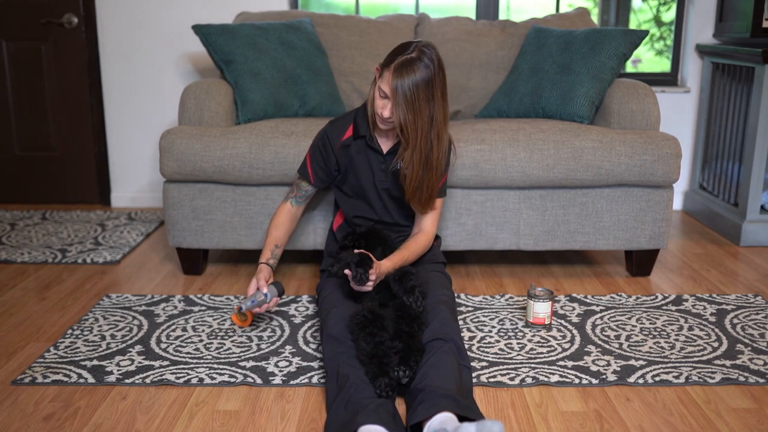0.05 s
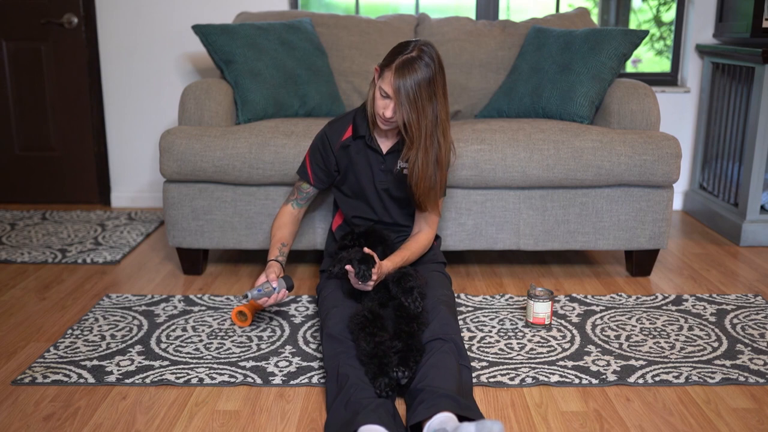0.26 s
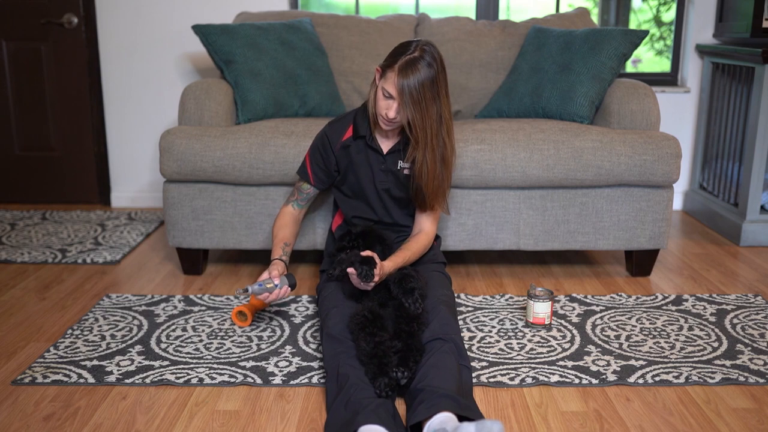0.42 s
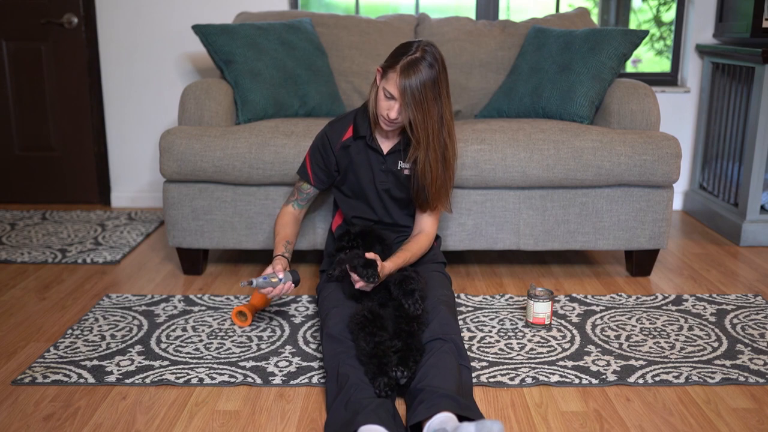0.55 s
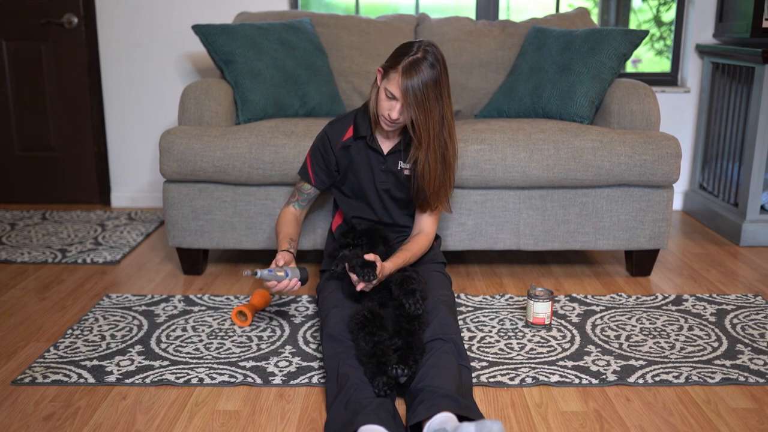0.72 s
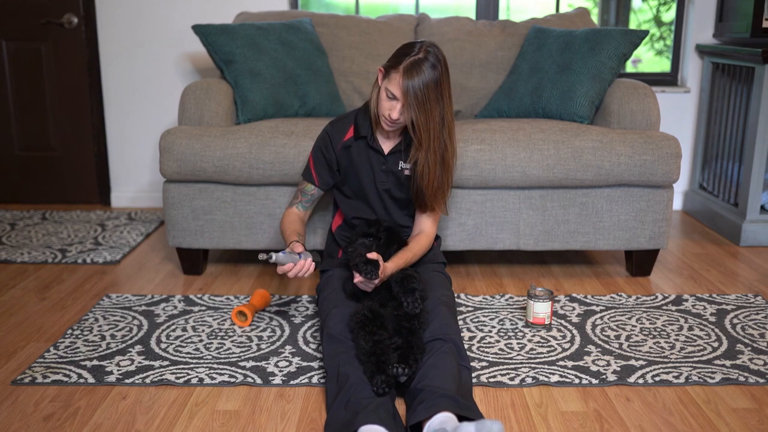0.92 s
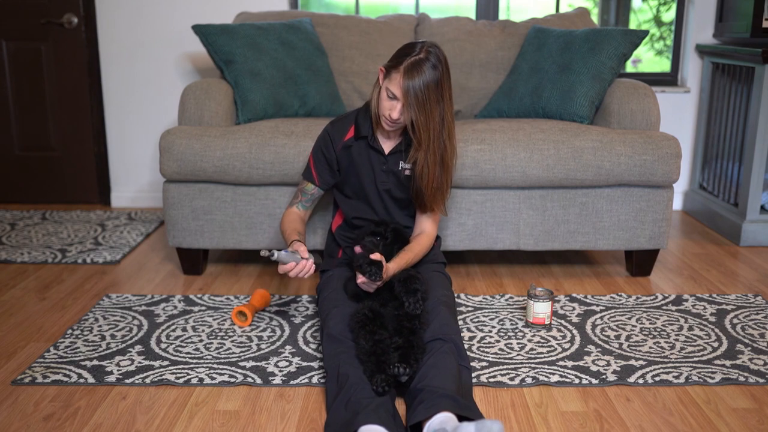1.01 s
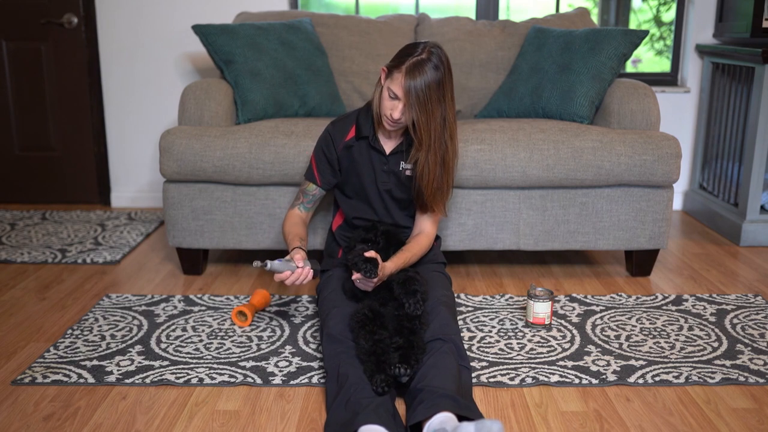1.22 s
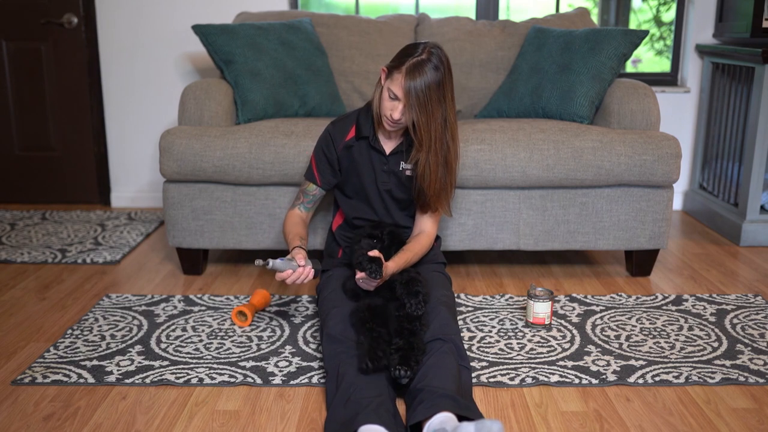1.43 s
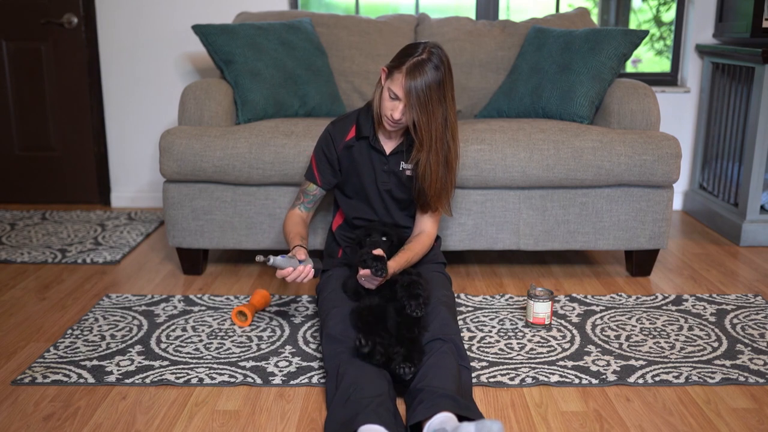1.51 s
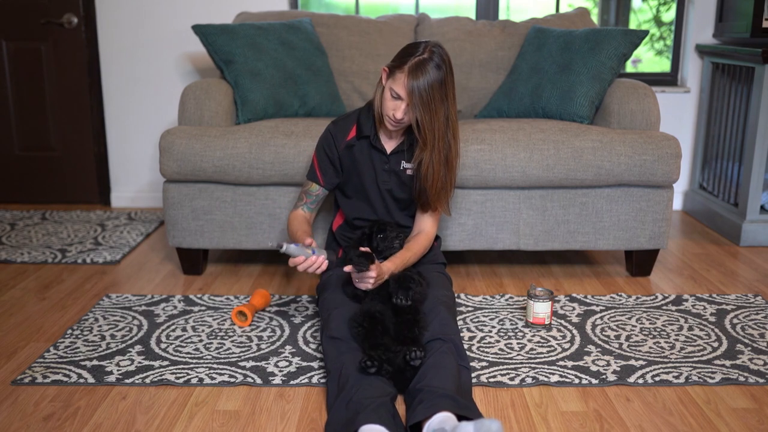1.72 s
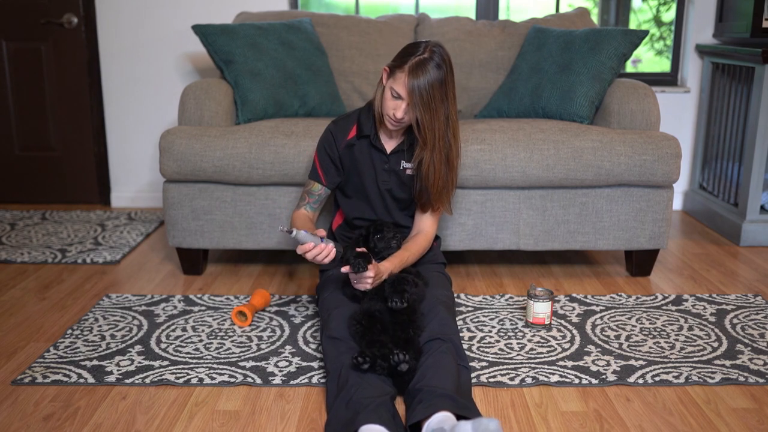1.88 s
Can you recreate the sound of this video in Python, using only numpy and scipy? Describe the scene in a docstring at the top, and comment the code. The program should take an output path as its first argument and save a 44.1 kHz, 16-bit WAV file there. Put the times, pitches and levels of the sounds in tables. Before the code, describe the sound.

A small battery rotary tool is handled indoors, a few metres away and slightly left. Light plastic ticks and rustle run from 0.1 s, with the sharpest switch snap near 0.43 s. The motor whines and hisses up at once, peaks by 0.6 s and coasts down until 0.95 s. After a faint rustle, a higher, more rattling burst starts at 1.2 s, peaks near 1.45 s and fades by 1.9 s over quiet room tone.

```python
"""A quiet living room: a small battery rotary tool is picked up a few metres from the microphone, slightly left.
Its plastic shell ticks and the switch snaps, as cracks of noise ringing the shell; the hand rustles in grainy noise.
The motor spins up and coasts down twice: tones for the commutator whine, pulsing noise for the brush hiss and
once-a-turn knocks for the shaft rattle. A hard surface returns a strong early echo, over a quiet room tone."""
import sys
import numpy as np
from scipy import signal
from scipy.fft import rfft, irfft
from scipy.io import wavfile
from scipy.ndimage import uniform_filter1d

SR = 44100
rng = np.random.default_rng(int(sys.argv[2]) if len(sys.argv) > 2 else 0)


def gain_from_decibels(decibels):
    """Convert decibel values to linear amplitude factors."""
    exponent = np.asarray(decibels, float) / 20
    return 10 ** exponent


def transcribe(u):
    """Save the signal u as a 16-bit wav file named by the first command-line argument.

    u: samples, shape (n,) or (channels, n), limited to [-1, 1]; the rate is SR.
    q: integer samples, one column per channel.
    """
    v = np.clip(np.atleast_2d(u).T, -1, 1)
    q = np.round(v * 32767).astype(np.int16)
    wavfile.write(sys.argv[1], SR, q)


N = 85995  # length in samples


def unit(x):
    """Scale to rms 1."""
    return x / np.sqrt(np.mean(x ** 2))


def shaped(x, points):
    """Filter by (Hz, dB) points joined on a log frequency axis."""
    hz, db = np.array(points, float).T
    f = np.arange(len(x) // 2 + 1) * SR / len(x) + 1
    gain = gain_from_decibels(np.interp(np.log(f), np.log(hz), db))
    return irfft(rfft(x) * gain, len(x))


def resonate(x, peaks):
    """Parallel band-pass resonances (Hz, width Hz, dB) of alternating sign."""
    out = 0
    for k, (hz, width, db) in enumerate(peaks):
        ring = signal.lfilter(*signal.iirpeak(hz, hz / width, SR), x)
        out = out + (-1) ** k * gain_from_decibels(db) * ring
    return out


def walk(rate):
    """Smooth random wander of rms 1, averaged twice over 1 / rate seconds."""
    k = int(SR / rate)
    once = uniform_filter1d(rng.standard_normal(N), k)
    return unit(uniform_filter1d(once, k))


# The two motor runs, as heard at the tool before the room. Each row: time in seconds, whine pitch in Hz,
# whine level in dB, brush hiss level in dB, shaft rattle level in dB.
MOTOR_RUNS = [
    [(.43, 853.5, -53, -41, -66), (.468, 1060, -56, -51, -64), (.5, 1209, -52, -49.5, -57),
     (.53, 1270, -40, -49.5, -73), (.562, 1285, -62, -53, -62), (.58, 1303, -46, -50.5, -74),
     (.615, 1275, -45, -54, -68), (.635, 1130, -68, -55, -59), (.655, 1000, -53.5, -52, -51),
     (.69, 940, -68, -55.5, -50), (.776, 873, -80, -58.5, -64), (.85, 798.3, -84, -67, -74.5),
     (.95, 701, -97, -90, -81)],
    [(1.21, 802.4, -82, -90, -64), (1.24, 928.4, -73, -55.5, -72), (1.262, 1030, -52, -54.5, -65),
     (1.31, 1262, -49.5, -48, -51.5), (1.35, 1350, -46.5, -50, -55.5), (1.385, 1427, -42.5, -51, -46.5),
     (1.43, 1462, -45, -49, -59), (1.458, 1460, -70, -50, -55), (1.486, 1443, -37, -49, -42),
     (1.525, 1295, -47, -47, -49), (1.555, 1130, -50, -49, -47), (1.585, 1011, -59, -50.5, -49.5),
     (1.65, 900, -66, -54, -56.5), (1.74, 745.4, -89, -60.5, -64), (1.81, 648.4, -83, -69, -67),
     (1.9, 552.3, -84, -79, -71)],
]
# Broad colour of the brush hiss. Each row: frequency in Hz, relative level in dB per Hz.
BRUSH_HISS_COLOUR = [(300, -43.5), (600, -35.5), (1200, -12.5), (1800, -16.5), (3900, -19.5), (7000, -17),
                     (11000, -18.5), (13000, -25), (15700, -29.5)]
# Resonances on top of the hiss. Each row: centre in Hz, width in Hz, relative level in dB.
BRUSH_HISS_PEAKS = [(4160, 190, -11), (5830, 670, 4), (8680, 400, -19), (11330, 300, 1.5)]
# Housing resonances that the knocks ring. Each row: centre in Hz, width in Hz, relative level in dB.
HOUSING_RESONANCES = [(1166, 340, -11.5), (1426, 74, 5.5), (1617, 98, 2.5), (1960, 560, -2),
                      (2435, 340, 1.5), (2940, 480, -4), (4580, 1150, -8), (9000, 8000, -22.5)]
# Weaker tones on the shaft. Each entry: multiple of the shaft rate.
SHAFT_MULTIPLES = (6, 8, 10, 12, 15, 18)
# Their strengths in the same order. Each entry: mean level against the whine in dB.
SHAFT_MULTIPLES_DB = [-31, -32, -11, -23.5, -11, -27.5]


def motor(t):
    """Whine on the commutator rate, hiss pulsing each turn, and a knock per turn that rings the housing."""
    rows = np.concatenate([np.array(run, float) for run in MOTOR_RUNS])
    running = sum((t >= run[0][0]) & (t <= run[-1][0]) for run in MOTOR_RUNS)
    hz, whine_db, hiss_db, rattle_db = (np.interp(t, rows[:, 0], rows[:, k]) for k in range(1, 5))
    cycles = np.cumsum(hz) / SR
    turn = cycles / 9  # nine whine cycles per shaft turn

    flutter_db, blur_hz, blur_db = 1.5, 60, -10
    blur = walk(blur_hz) + 1j * walk(blur_hz)
    wavering = gain_from_decibels(flutter_db * walk(25)) + gain_from_decibels(blur_db) * blur
    whine = np.real(np.exp(2j * np.pi * cycles) * wavering)
    shaft_tones = 0
    for k, db in zip(SHAFT_MULTIPLES, SHAFT_MULTIPLES_DB):
        shaft_tones = shaft_tones + gain_from_decibels(db + 2.9 * walk(19)) * np.sin(2 * np.pi * k * turn)

    noise = rng.standard_normal(N)
    hiss = unit(shaped(noise, BRUSH_HISS_COLOUR)) + 2 * resonate(noise, BRUSH_HISS_PEAKS)
    hiss = hiss * (1 + 0.16 * np.cos(2 * np.pi * turn))

    knock_scatter_db, grit_db = 2.5, -4
    new_turn = np.diff(np.floor(turn), prepend=0) > 0
    knocks = new_turn * gain_from_decibels(knock_scatter_db * rng.standard_normal(N))
    gritty_knocks = unit(knocks) + gain_from_decibels(grit_db) * rng.standard_normal(N)
    rattle = unit(resonate(gritty_knocks, HOUSING_RESONANCES))

    mix = gain_from_decibels(whine_db) * (whine + shaft_tones) + gain_from_decibels(hiss_db) * hiss + gain_from_decibels(rattle_db) * rattle
    return mix * uniform_filter1d(running * 1., size=400)  # soft edges


# Ticks of shell and switch at the tool. Each row: start in seconds, relative level in dB,
# favoured region in Hz, crack time scale in ms.
SHELL_TICKS = [(0.136, -36, 3080, 0.71), (0.1724, -35.5, 2400, 0.52), (0.2272, -45, 8000, 1.5),
               (.242, -29, 5200, 1.84), (0.289, -43, 9000, 1.9), (0.3387, -40, 1960, 1),
               (.381, -39, 2900, 1), (0.4054, -36, 1390, 0.61), (0.4252, -19.5, 3940, 0.95),
               (0.47, -34.5, 7000, 1.46)]
# Broad resonances of the plastic shell. Each row: centre in Hz, width in Hz, relative level in dB.
SHELL_RESONANCES = [(900, 580, -5.5), (1202, 160, 1), (1730, 170, -0.5), (2253, 610, -1.5),
                    (2675, 720, 1.5), (3587, 440, 0.5), (4370, 520, 1.5), (5560, 1200, 0.5),
                    (7090, 2200, 6.5), (8300, 2100, 6), (10460, 5400, 4.5), (14500, 8400, -18)]


def ticks():
    """Each tick is a short crack of noise shared out over the broad resonances of the shell."""
    size = 2000  # samples per tick
    all_ticks_db, scatter_db, favour_db_per_oct2 = -11, 1, 2.5
    out, tau = np.zeros(N + size), np.arange(size) / SR
    draws = rng.standard_normal((len(SHELL_TICKS), size + len(SHELL_RESONANCES)))
    for (start, tick_db, favoured_hz, ms), chance in zip(SHELL_TICKS, draws):
        x = tau * 1000 / ms
        crack = chance[:size] * x * np.exp(-2 * x)
        first = int(start * SR)
        for (hz, width, db), scatter in zip(SHELL_RESONANCES, chance[size:]):
            octaves = np.log2(hz / favoured_hz)
            ring_db = db + scatter_db * scatter - favour_db_per_oct2 * octaves ** 2
            ring = resonate(resonate(crack, [(hz, width, 0)]), [(hz, 2 * width, 0)])
            ring = unit(ring) * np.sqrt(ms * SR / 1000 / size)  # longer cracks carry more energy
            out[first:first + size] += gain_from_decibels(tick_db + all_ticks_db + ring_db) * ring
    return out[:N]


# Fingers and cloth rustling on the shell, before the room. Each row: time in seconds, level in dB.
HAND_RUSTLE = [(.12, -103), (.145, -59), (.23, -60.5), (.27, -63), (.36, -62.5), (.42, -59), (.45, -76),
               (.98, -83), (1.05, -63.5), (1.13, -91)]


def rustle(t):
    """Grainy friction noise in one broad band while the hand shifts."""
    grains = rng.standard_normal(N) * gain_from_decibels(2.5 * walk(300))
    friction = unit(resonate(grains, [(2380, 2200, 0)]))
    seconds, db = np.array(HAND_RUSTLE).T
    return gain_from_decibels(np.interp(t, seconds, db)) * friction


# Hard echoes after the first. Each row: delay in seconds, level against the direct sound in dB,
# lean to the right (1 is 2 dB up and 10 samples later on the right, the reverse on the left).
LATER_ECHOES = [(.0131, -10, -.5), (.0203, -6, .6), (.034, -10, -.4)]


def room(x):
    """Direct sound, a few hard echoes and a diffuse tail that differs left and right."""
    tail_db, t60_low_s, t60_high_s = 1.5, .36, .5
    bass_shared = .75  # share of the low tail's power common to both sides
    left_over_right_db = 1.5
    echoes = [(.0065, 1.5, 0)] + LATER_ECHOES  # the first is stronger than the direct sound
    tau, out = np.arange(SR // 2) / SR, []
    common = rng.standard_normal(len(tau))
    for side in (-1, 1):  # left, right
        own = rng.standard_normal(len(tau))
        low = uniform_filter1d(np.sqrt(bass_shared) * common + np.sqrt(1 - bass_shared) * own, size=9)
        high = np.diff(rng.standard_normal(len(tau)), prepend=0)
        tail = low * gain_from_decibels(-60 * tau / t60_low_s) + 0.37 * high * gain_from_decibels(-60 * tau / t60_high_s)
        tail *= np.clip((tau - .008) / 0.0052, 0, 1)  # sets in after 8 ms
        response = gain_from_decibels(tail_db) * tail / np.sqrt(np.sum(tail ** 2))
        response[0] += 1
        for delay, db, lean in echoes:
            response[int(delay * SR + side * lean * 10)] += gain_from_decibels(db + side * lean * 2)
        heard = signal.fftconvolve(x, response)[:N]
        out.append(gain_from_decibels(-side * left_over_right_db / 2) * heard)
    return .6 * np.array(out)


# Colour of the room tone at the microphone. Each row: frequency in Hz, relative level in dB per Hz.
AIR_COLOUR = [(20, -32), (40, -40), (60, -20), (110, -22), (150, -13.5), (210, -14), (400, -2.5),
              (650, -4.5), (1200, -3), (2240, -8), (4520, -10.5), (15600, -16.5)]
# Stereo spread of the room tone. Each row: frequency in Hz, side minus mid in dB.
AIR_SPREAD = [(30, -19), (60, -23), (125, -14), (250, -10), (500, -5), (1000, -0.5), (2400, 2), (8000, 1.5),
              (15000, -1)]
# Faint wavering tones. Each row: frequency in Hz, mean level in dB.
HUM_TONES = [(165, -92), (150, -98)]


def air(t):
    """Quiet room tone and microphone hiss as shaped stereo noise, with a faint wavering hum."""
    mid, other = (gain_from_decibels(-64) * unit(shaped(rng.standard_normal(N), AIR_COLOUR)) for _ in range(2))
    hum = sum(gain_from_decibels(db + 4 * walk(12)) * np.sin(2 * np.pi * hz * t) for hz, db in HUM_TONES)
    side = shaped(other, AIR_SPREAD)
    return mid + hum + side * np.array([[1], [-1]])


def scene():
    """Tool and hand in the room, over the room tone."""
    t = np.arange(N) / SR
    return room(motor(t) + ticks() + rustle(t)) + air(t)


def band_limit(x):
    """A steep low-pass at the top of the band."""
    return signal.sosfilt(signal.butter(12, 16820, fs=SR, output="sos"), x)


def record(dry):
    """A steep low-pass filter cuts the top of the sound above 15.75 kHz."""
    top = signal.ellip(10, .2, 70, 15750, fs=SR, output="sos")
    mix = signal.sosfilt(top, dry)
    return band_limit(mix)


dry = scene()
out = record(dry)
transcribe(out)
```